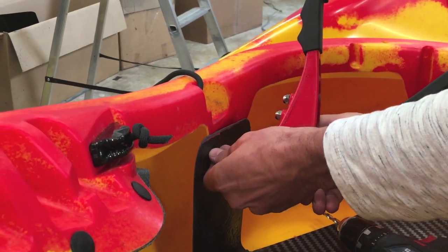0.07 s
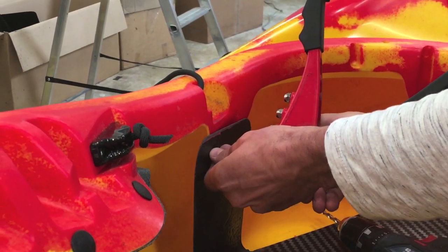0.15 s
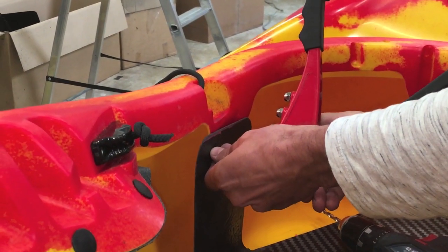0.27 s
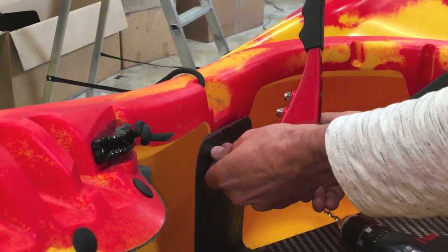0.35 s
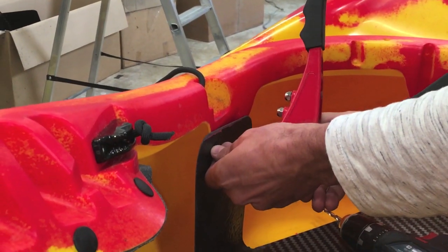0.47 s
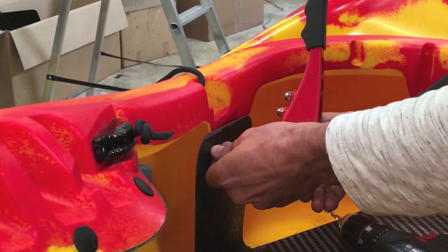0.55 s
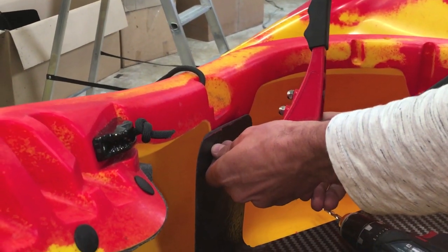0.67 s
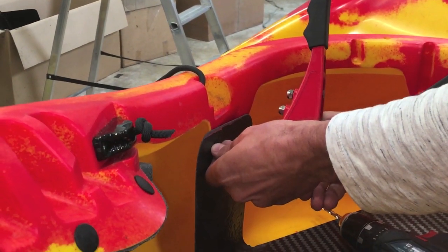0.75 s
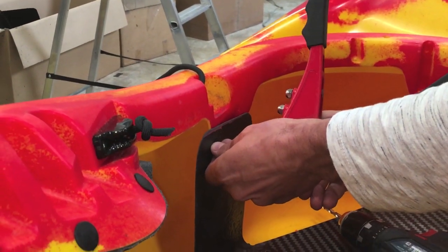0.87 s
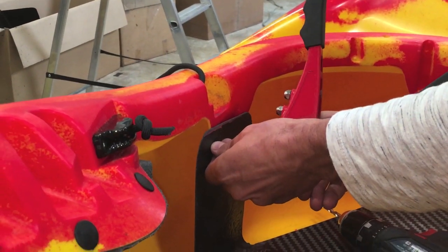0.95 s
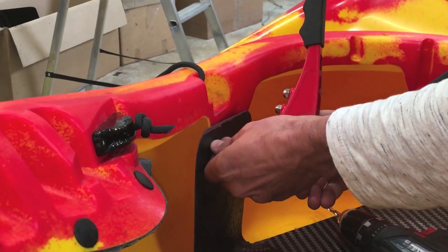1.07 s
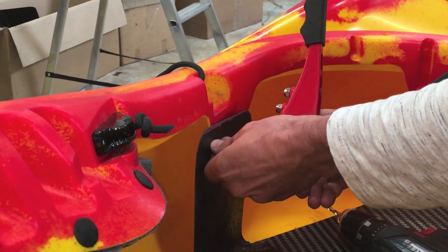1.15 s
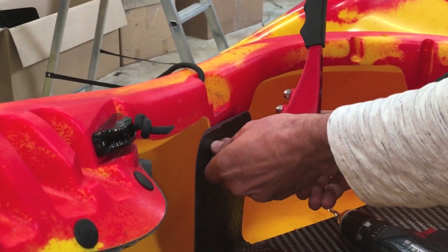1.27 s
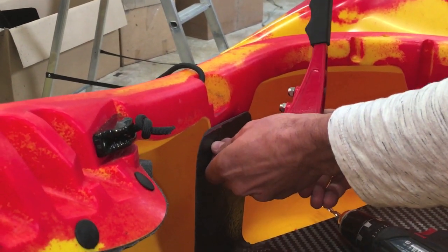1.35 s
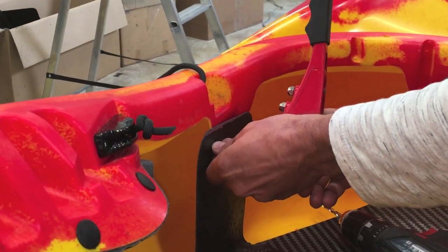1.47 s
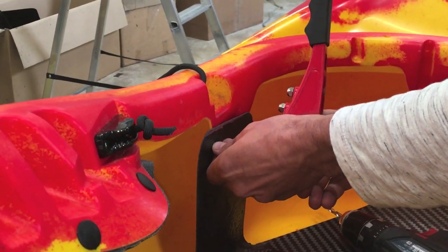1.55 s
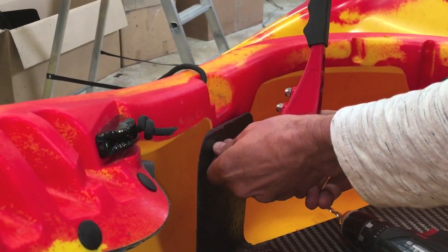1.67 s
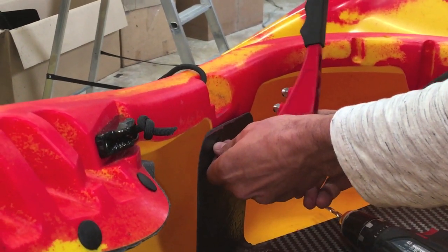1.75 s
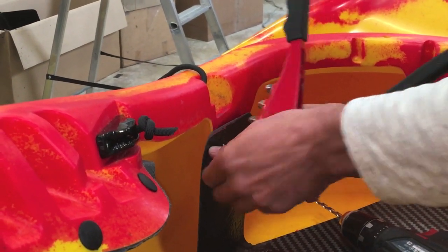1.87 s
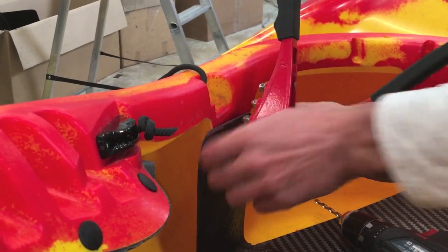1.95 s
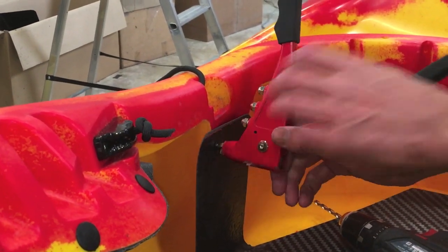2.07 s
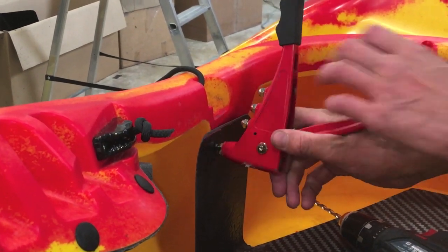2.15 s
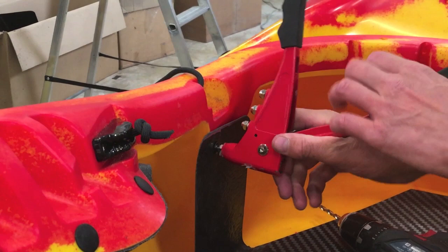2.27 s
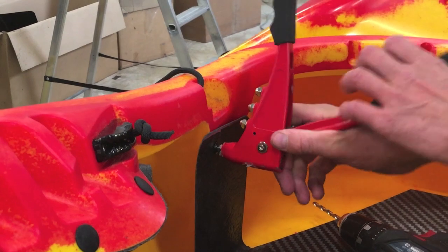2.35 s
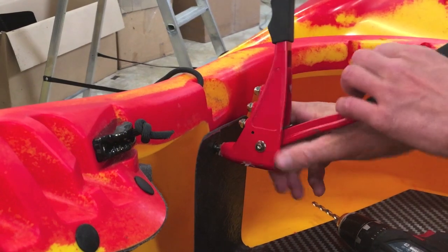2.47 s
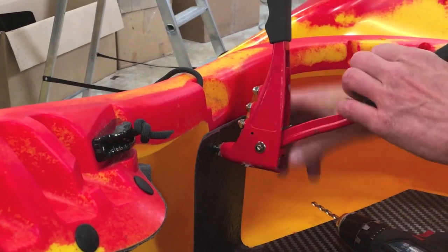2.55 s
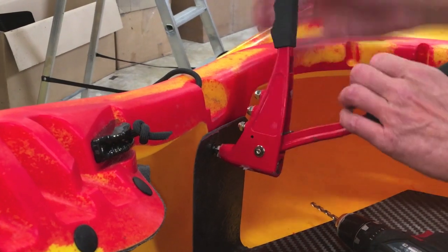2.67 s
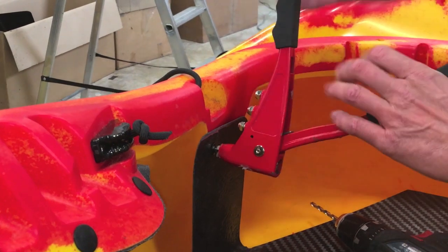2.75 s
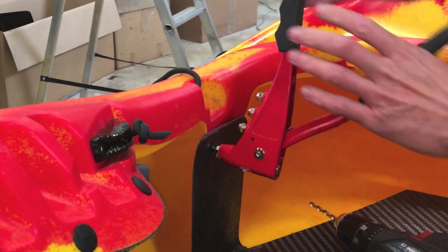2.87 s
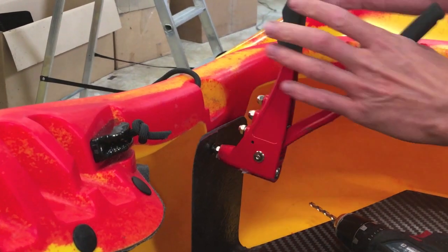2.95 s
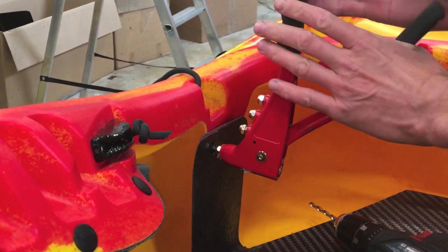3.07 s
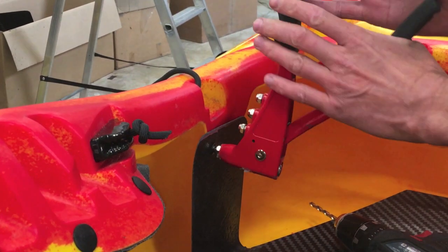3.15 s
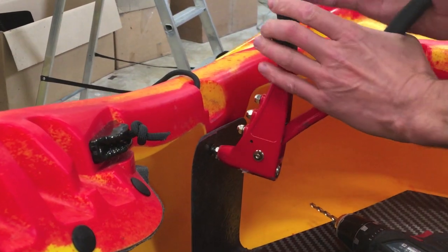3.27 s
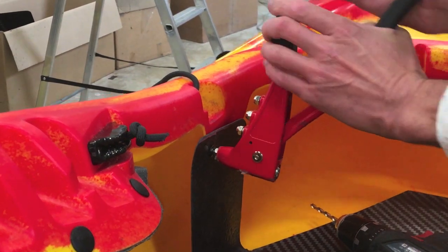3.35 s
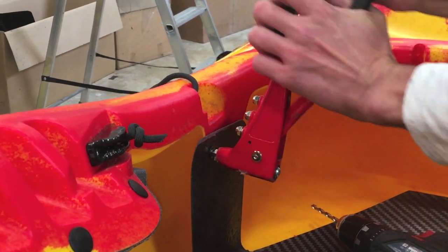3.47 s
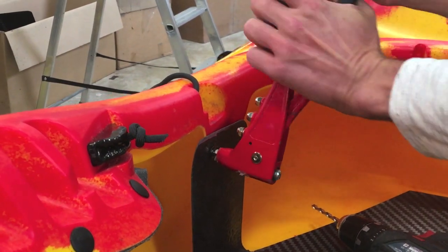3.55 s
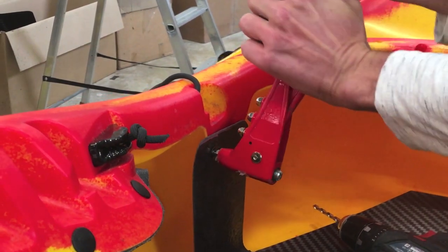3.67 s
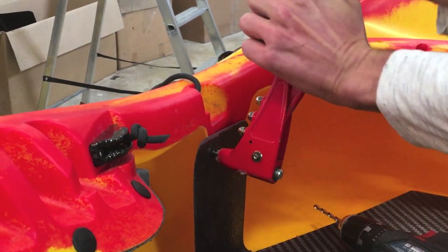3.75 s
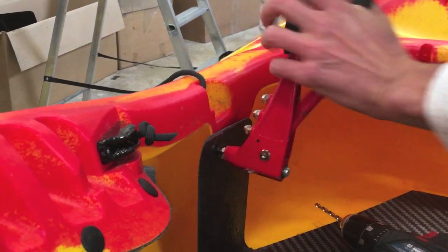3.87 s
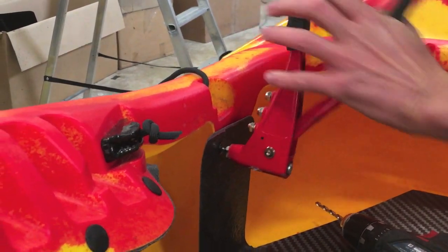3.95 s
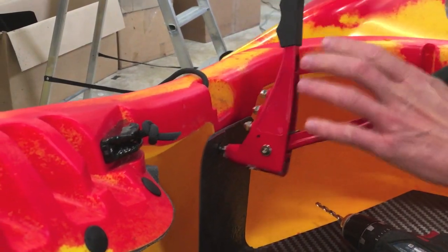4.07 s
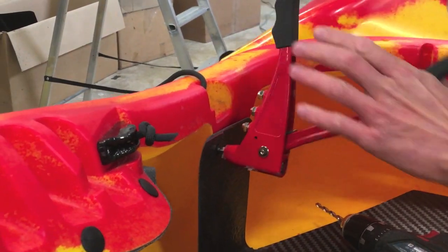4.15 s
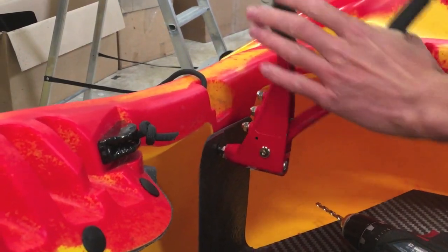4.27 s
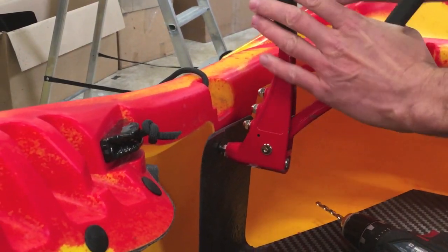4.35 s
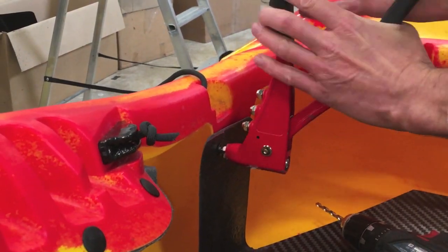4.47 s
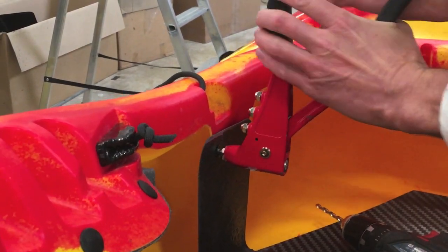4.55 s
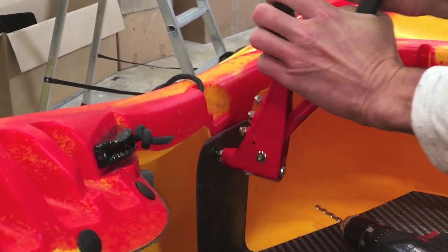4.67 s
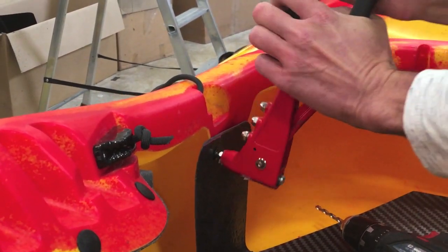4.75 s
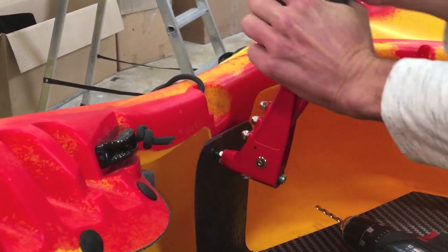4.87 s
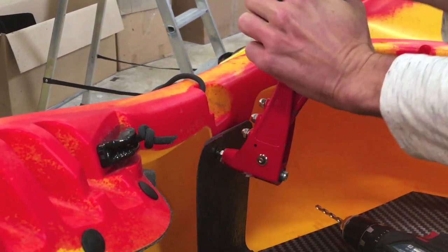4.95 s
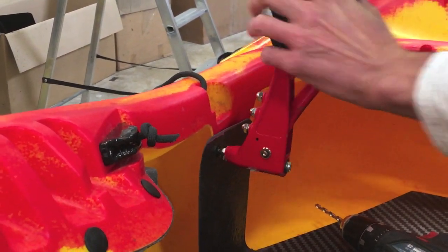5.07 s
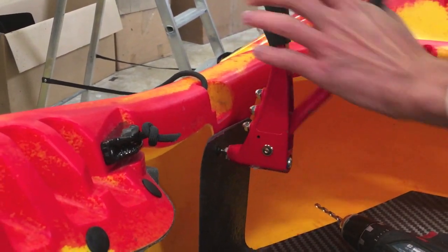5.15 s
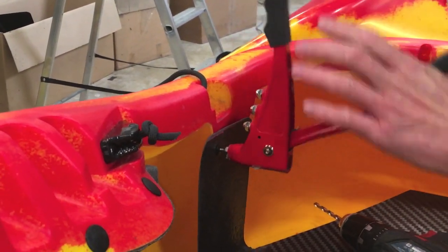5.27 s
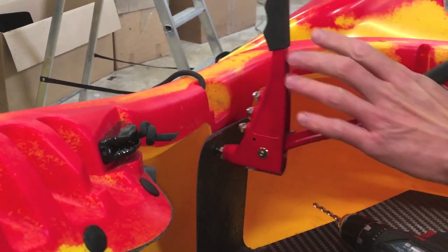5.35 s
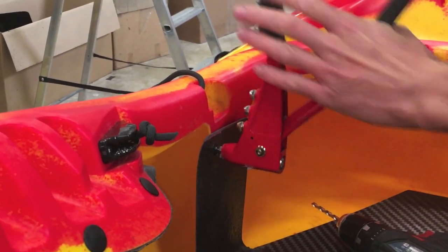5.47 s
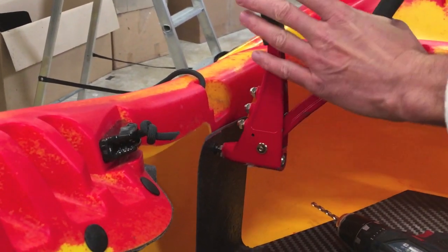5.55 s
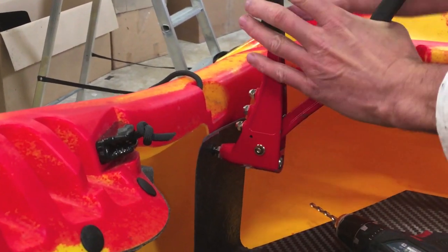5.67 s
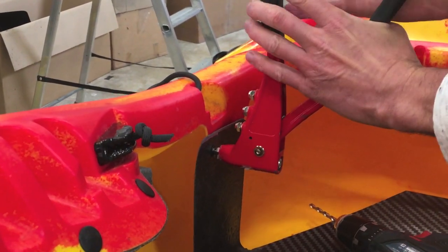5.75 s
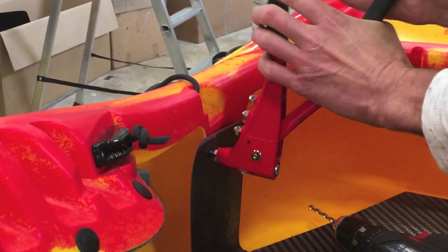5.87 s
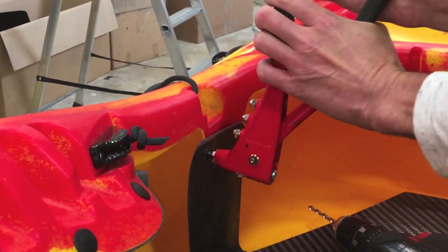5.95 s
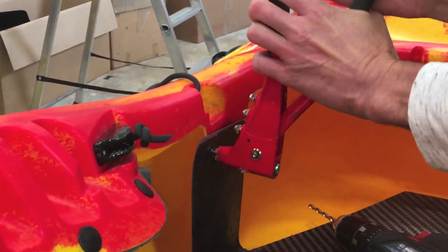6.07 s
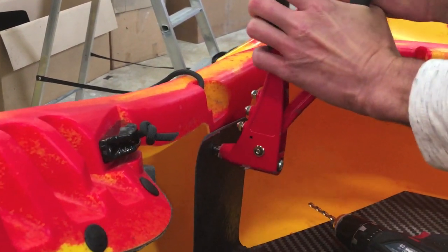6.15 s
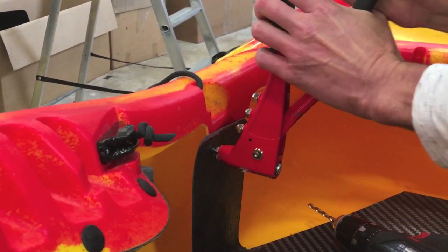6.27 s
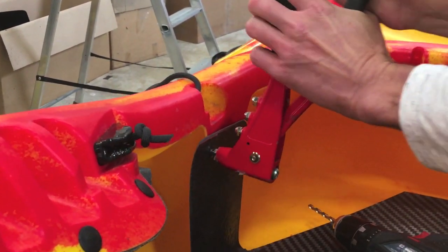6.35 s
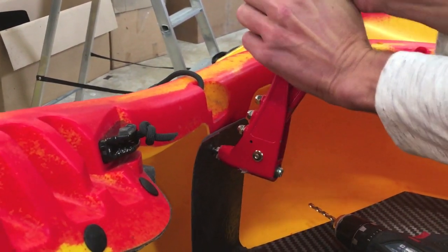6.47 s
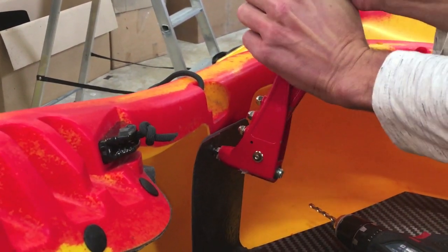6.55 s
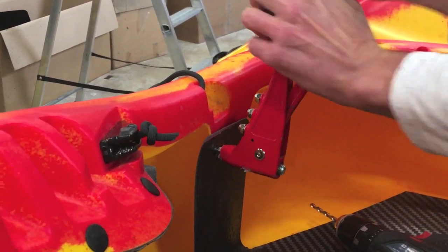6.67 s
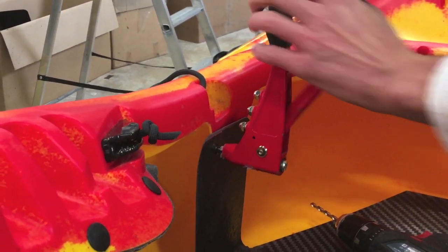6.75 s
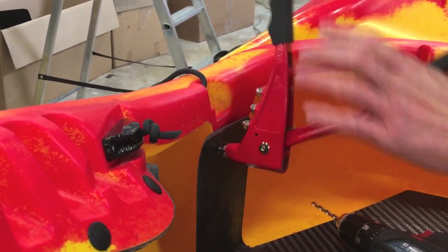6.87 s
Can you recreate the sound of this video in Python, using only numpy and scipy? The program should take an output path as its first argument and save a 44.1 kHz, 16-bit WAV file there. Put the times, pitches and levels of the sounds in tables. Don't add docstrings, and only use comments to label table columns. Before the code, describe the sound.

Close in a faintly humming workshop, hands softly bump and scuff a hollow plastic hull. A shuffle of knocks follows near two seconds, then deep thumps. A hand rivet tool is squeezed: bright steel creaks of rapid uneven clicks end in a handle clack, then again. A hard snap rings the wall, followed by two shorter grating squeezes and final knocks. Short room echo.

```python
import sys
import numpy as np
from scipy import signal
from scipy.fft import rfft, irfft
from scipy.io import wavfile
from scipy.ndimage import uniform_filter1d

SR = 44100
rng = np.random.default_rng(int(sys.argv[2]) if len(sys.argv) > 2 else 0)


def master(y):
    cut = np.clip(np.atleast_2d(y).T, -1, 1)
    pcm = np.round(cut * 32767)
    wavfile.write(sys.argv[1], SR, pcm.astype(np.int16))


N = 304731
STEP = 32


def gain_of(db):
    return np.exp(np.log(10) / 20 * np.asarray(db))


def evened(x):
    return x / np.sqrt(np.mean(x ** 2) + 1e-20)


def read(points, hz):
    f, value = np.transpose(points)
    return np.interp(np.log(hz + 1), np.log(f + 1), value)


def add(mix, s, sound):
    part = mix[round(s * SR):][:len(sound)]
    part += sound[:len(part)]


def wander(size):
    return evened(uniform_filter1d(rng.standard_normal(N), size=size))


def smooth(db):
    return np.interp(np.arange(N) / STEP, np.arange(len(db)), gain_of(db))


def swell(start, hold, first_db, last_db, rise, fall):
    t = np.arange(0, N + STEP, STEP) / SR - start
    held_db = first_db + (last_db - first_db) * np.clip(t / hold, 0, 1)
    return held_db + rise * np.minimum(t, 0) - fall * np.maximum(t - hold, 0)


def stroke(start, hold, first_db, last_db):
    return swell(start, hold, first_db, last_db, rise=3500, fall=520)


def coloured(points):
    frames, hz = N // 128 + 5, np.fft.rfftfreq(512, 1 / SR)
    a, b, patches = rng.standard_normal((frames, 257, 3)).T
    patches = uniform_filter1d(patches, size=6, axis=0)
    patches = evened(uniform_filter1d(patches, size=14, axis=1))
    z = (a + 1j * b) * gain_of(read(points, hz)[:, None] + 2.5 * patches)
    return evened(signal.istft(z, nperseg=512, noverlap=384)[1][:N])


def rings(modes, size):
    t = np.arange(size) / SR
    fade = np.cos(np.pi / 2 * t / t[-1])
    return fade * sum(gain_of(db - 60 * t / t60) * np.sin(2 * np.pi * hz * t) for hz, db, t60 in modes)


def blurred(hz, t, size):
    a, b = uniform_filter1d(rng.standard_normal((2, len(t))), size=size, axis=1)
    return evened(a * np.sin(2 * np.pi * hz * t) + b * np.cos(2 * np.pi * hz * t))


# frequency in Hz, level in dB per Hz.
AIR_COLOUR = [(15, -52.5), (25, -3), (60, 13), (87, -23), (177, -27), (349, -32), (878, -25.5),
              (1390, -30.5), (3510, -38.5), (4860, -42), (10400, -41), (15200, -35), (16500, -71)]


def air():
    hz = np.fft.rfftfreq(N, 1 / SR)
    spectrum = rfft(rng.standard_normal(N)) * gain_of(read(AIR_COLOUR, hz))
    return gain_of(-56) * evened(irfft(spectrum, N))


# time in seconds, effort in dB.
GRIP = [(0, -49.5), (0.9, -61), (1.05, -48.5), (1.82, -61.5), (1.94, -38), (2.5, -59.5), (3.04, -40.5),
        (3.25, -52.5), (3.81, -42), (4.06, -36.5), (4.2, -34.5), (4.7, -51.5), (4.98, -41.5), (5.2, -47),
        (5.46, -27.5), (5.699, -47), (6.5, -53), (6.91, -42)]


def effort():
    s, db = np.transpose(GRIP)
    return gain_of(np.interp(np.arange(N) / SR, s, db))


# start in seconds, hold in seconds, scuff in dB, dry hiss in dB.
RUBS = [(0, 0.0042, -47.5, -84), (0.042, 0.38, -66, -92), (0.602, 0.13, -62, -98), (0.974, 0.052, -47, -70),
        (1.245, 0.07, -58, -104), (1.358, 0.0089, -60, -69.5), (1.55, 0.1, -60.5, -88),
        (1.767, 0.14, -62, -74.5), (1.929, 0.019, -38.5, -51.5), (2.097, 0.37, -65.5, -76),
        (2.532, 0.008, -52, -62.5), (2.952, 0.045, -53, -58.5), (3.087, 0.15, -63, -73),
        (3.884, 0.051, -46.5, -72), (4.052, 0.056, -43.5, -69), (4.104, 0.011, -38, -54),
        (4.314, 0.0046, -42.5, -75), (4.472, 0.25, -74, -68.5), (4.805, 0.0088, -49.5, -57),
        (4.903, .01, -50.5, -65.5), (5.079, 0.662, -57, -78), (5.386, 0.0038, -32.5, -45),
        (5.42, .045, -53, -62.5), (5.56, 0.065, -52.5, -79), (5.518, 0.006, -35.5, -67.5),
        (5.6, 0.14, -63, -77.5), (5.846, 0.19, -83, -64.5), (6.14, 0.064, -62.5, -69),
        (6.576, 0.15, -61, -77), (6.781, 0.0083, -44, -53.5), (6.894, 0.017, -37, -58)]


def rubbing():
    rise, scuff_fall, hiss_fall = 450, 211, 317
    stroke_hiss_db = -20
    scuff = [swell(s, hold, db, db, rise, scuff_fall) for s, hold, db, _ in RUBS]
    hiss = [swell(s, hold, db, db, rise, hiss_fall) for s, hold, _, db in RUBS]
    hiss += [stroke(*row[:-1]) + stroke_hiss_db for row in SQUEEZES + OPENINGS]
    return smooth(np.max(scuff, axis=0)), smooth(np.max(hiss, axis=0))


# frequency in Hz, level in dB, t60 in seconds.
PANEL = [(525, -7.5, 0.13), (648, -4, 0.055), (934, 7, 0.014)]
# frequency in Hz, level in dB per Hz.
SCUFF_COLOUR = [(150, -48), (250, 7.5), (369, -2.5), (725, -1), (817, -17), (1490, -36), (1600, -7.5),
                (2070, -26.5), (3400, -20.5), (6190, -62), (9000, -44), (11700, -64), (19800, -120)]
# frequency in Hz, level in dB per Hz.
HISS_COLOUR = [(1470, -3), (2500, 1.5), (7550, -6.5), (9650, 5.5), (10400, -14.5), (12100, 2.5),
               (15100, -2), (16100, -11.5), (16500, -38.5)]


def hands(scuff, hiss):
    grip_scuff_db = -24
    panel = evened(signal.oaconvolve(rng.standard_normal(N), rings(PANEL, size=4000))[:N])
    rub = coloured(SCUFF_COLOUR) + 0.48 * panel
    dull_flicker = gain_of(-6.0 + 3.17 * wander(size=400))
    dry_flicker = gain_of(3.0 + 2.8 * wander(size=150))
    dull = (scuff + gain_of(grip_scuff_db) * effort()) * dull_flicker * rub
    return dull + hiss * dry_flicker * coloured(HISS_COLOUR)


def knock(db, edge_db, treble_db, hz, ring_db, t60=0.14):
    t = np.arange(SR // 4) / SR
    low, mid, high = rng.standard_normal((3, len(t)))
    body = evened(signal.sosfilt(signal.butter(2, [250, 1800], "band", fs=SR, output="sos"), low))
    edge = evened(signal.sosfilt(signal.butter(2, [1800, 6000], "band", fs=SR, output="sos"), mid))
    crack = evened(signal.sosfilt(signal.butter(2, 6000, "high", fs=SR, output="sos"), high))
    part = np.sin(2 * np.pi * hz * t) * gain_of(-60 * t / 0.06)
    part += blurred(hz * (1 - 0.16 * t), t, size=130) * gain_of(-12.0 - 60 * t / 0.19)
    body *= gain_of(2.4 * evened(uniform_filter1d(high, size=350)))
    sound = (body * gain_of(-60 * t / t60) + gain_of(ring_db) * part) * np.minimum(t / 0.0037, 1)
    sound += edge * gain_of(edge_db) * (gain_of(-60 * t / (0.94 * t60)) + gain_of(3.0 - 60 * t / 0.0054))
    sound += gain_of(edge_db + 1 - 60 * t / (0.52 * t60)) * blurred(3350, t, size=110)
    sound += gain_of(-15 - 60 * t / (0.71 * t60)) * blurred(1600, t, size=130)
    low_rise = np.minimum(t / 0.0065, 1)
    sound += gain_of(-9.0 - 60 * t / (0.9 * t60)) * low_rise * blurred(270, t, size=200)
    sound += crack * gain_of(treble_db - 60 * t / (0.26 * t60))
    return gain_of(db - 10.5) * sound * np.minimum(t / 0.00036, 1)


# start in seconds, peak in dB, edge in dB, treble in dB.
KNOCKS = [(0.004, -50.5, -27, -28), (0.151, -49, -25, -26), (0.195, -51, -11.5, -26),
          (0.624, -59, -25, -27), (0.69, -62, -6, -24), (0.903, -53.5, -19, -18), (0.977, -38, -16, -16),
          (1.24, -46, -30, -32), (1.536, -40.5, -13, -30), (1.855, -45, -5, 9.5), (1.911, -32.5, -19, 1),
          (1.988, -35, -11.5, 3), (2.52, -45, 6, 17.5), (2.846, -57, 0, 14), (3.215, -50.5, -21, -6),
          (4.041, -33, -8.5, -15), (4.079, -43, 3.5, -8), (4.115, -26.5, -0.5, 7), (4.201, -46, 8.5, 13.5),
          (4.297, -40.5, -0.5, -11), (4.804, -47, -15, -22), (5.091, -40, -31, -7), (5.129, -40, -20, -2),
          (5.253, -30.5, -9.5, -13), (5.309, -38.5, -23, -25), (5.383, -25, 5, 18), (5.525, -35.5, -5, 4),
          (6.134, -76, -19.5, -4), (6.743, -37.5, -25, -25), (6.777, -40, -7, -13)]


def knocks():
    wall_hz, spread = 609.4, 0.1324
    even_ring_db, ring_per_db = -26.5, -0.5
    out = np.zeros(N)
    for (s, db, *colour), spot in zip(KNOCKS, rng.uniform(-1.053, 1, len(KNOCKS))):
        ring_db = ring_per_db * (db - even_ring_db)
        add(out, s, knock(db, *colour, wall_hz * (1 + spread * spot), ring_db))
    return out


# start in seconds, length in seconds, frequency in Hz, level in dB.
SQUEALS = [(2.937, 0.35, 3690, -74), (3.282, 0.39, 3700, -71), (4.286, 0.31, 3720, -75.5),
           (5.24, 0.13, 3790, -65.5), (5.493, 0.1, 3770, -77), (5.845, 0.14, 2456, -63),
           (6.369, 0.14, 3640, -67.5), (6.373, 0.21, 2090, -72), (6.798, 0.1, 4800, -65),
           (0.14, 0.33, 525, -68), (5.123, 0.08, 2200, -65)]


def squeals():
    out = np.zeros(N)
    for s, length, hz, db in SQUEALS:
        t = np.arange(0, length, 1 / SR)
        add(out, s, gain_of(db) * np.sqrt(np.sin(np.pi * t / length)) * blurred(hz, t, size=260))
    return out


def bending(x, lag_s=0.0174, slope=0.8):
    hz = np.fft.rfftfreq(len(x), 1 / SR)
    delay = 0.004 + lag_s * (70 / np.maximum(hz, 40)) ** slope
    soft = 1 / (1 + (hz / 270) ** 6)
    phase = np.exp(-2j * np.pi * np.cumsum(delay) * hz[1])
    wave = irfft(rfft(x) * soft * phase, len(x))
    return wave * signal.windows.tukey(len(x), 0.02)


# frequency in Hz, level in dB, t60 in seconds.
HULL = [(45.6, -40, .3), (63, -6.5, 0.74), (76.95, 3, 0.81), (86.2, -2, 0.12), (116.2, -2, 0.35),
        (147.6, -2, 0.24), (169.7, -8.5, 0.42), (222.2, -1.5, 0.087), (295.3, -12.5, 0.22)]


def boom(detune):
    modes = np.array(HULL) * np.transpose([detune, 1 + 0 * detune, 1 + 0 * detune])
    t = np.arange(2 ** 14) / SR
    passing = (0.5 + 0.54 * np.exp(-(t / 0.017) ** 2)) * np.minimum(t / 0.003, 1)
    return [bending(passing * rings(part, size=len(t))) for part in (modes[:3], modes[3:])]


# start in seconds, peak in dB, upper modes in dB.
THUMPS = [(0.162, -35, 3), (0.629, -48, 6), (0.901, -51.5, 9), (0.99, -29, -13), (1.241, -36, -17),
          (1.554, -32, 0), (1.862, -27, -12), (1.927, -31, -12), (2, -38, 17), (2.203, -28, 3),
          (2.444, -32, 8.5), (2.529, -18.5, 4), (2.839, -17.5, -5), (2.978, -24.5, -2), (3.402, -37, -25),
          (3.55, -30, -5), (3.688, -28, 4), (3.698, -17, 2.5), (3.893, -29.5, 13.5), (4.049, -24.5, 5.5),
          (4.116, -16, 5.5), (4.322, -19, -2.5), (4.806, -20, -7), (4.906, -36, 7), (4.915, -17.5, -0.5),
          (5.12, -36, 12.5), (5.277, -25, 3), (5.389, -17, 8.5), (5.529, -26.5, 16), (5.933, -24.5, -35),
          (6.142, -35, -1), (6.578, -32, 14.5), (6.591, -20, -3), (6.747, -28.5, 12.5), (6.777, -17.5, 2),
          (6.881, -17.5, 2.5)]


def hull(scuff):
    grip_upper_db, rub_upper_db = -16.5, 4
    out = np.zeros(N)
    chances = rng.standard_normal((len(THUMPS), len(HULL)))
    for (s, db, upper_db), chance in zip(THUMPS, chances):
        low, upper = boom(1 + 0.0649 * chance)
        add(out, s - 0.004, gain_of(db - 7) * (low + gain_of(upper_db - 1.0) * upper))
    low_drive = effort()
    upper_drive = gain_of(grip_upper_db) * effort() + gain_of(rub_upper_db) * scuff
    for modes, drive in zip(boom(np.ones(len(HULL))), (low_drive, upper_drive)):
        rumble = evened(signal.oaconvolve(rng.standard_normal(N), modes)[:N])
        out += gain_of(3.0) * drive * rumble
    return out


# start in seconds, peak in dB, edge in dB, treble in dB, struck part in Hz.
CLACKS = [(0.262, -53.5, -26, -24, 730), (1.318, -50.5, -31, -14, 860), (1.351, -53, -5, 17.5, 1596),
          (2.978, -42, -9, -6, 868), (3.395, -48.5, -22, -7, 916), (3.688, -29.5, -6, -12, 1606),
          (3.875, -38.5, -11.5, -16, 952), (4.909, -32, -4, -22, 1330), (5.368, -34.5, -2, 4.5, 890),
          (6.525, -48, -8, -3, 896), (6.5801, -32, -3.5, -24, 1330), (6.88, -26, -20, -13, 1050)]


def clacks():
    out = np.zeros(N)
    for s, *blow in CLACKS:
        add(out, s, knock(*blow, ring_db=6))
    return out


# start in seconds, peak in dB, edge in dB, treble in dB, struck part in Hz.
BUMPS = [(0.945, -51, -20, -30, 563), (0.989, -39.5, -4.5, -20, 3460), (1.233, -51, -16, -30, 1620),
         (1.268, -48.5, -24, -30, 586), (1.353, -44, -13, -20, 2100), (1.926, -35, -14, -15, 756),
         (1.969, -32.5, -12.5, -20, 3240), (4.131, -36, -15, -20, 1080)]


def bumps():
    out = np.zeros(N)
    for s, *blow in BUMPS:
        add(out, s, knock(*blow, ring_db=-1.3, t60=0.13))
    return out


# start in seconds, peak in dB.
TICKS = [(1.603, -48), (1.6541, -49), (1.668, -49), (2.161, -41.5), (2.2977, -45), (2.4864, -47),
         (2.55, -43), (2.709, -47), (2.826, -43), (3.2114, -37), (3.8692, -37.5), (3.931, -52),
         (4.047, -42), (4.083, -47), (4.108, -44), (4.138, -28), (4.155, -25), (4.978, -50), (5.032, -47),
         (6.145, -41), (6.743, -37.5)]


def ticks():
    out, t = np.zeros(N), np.arange(2000) / SR
    for s, db in TICKS:
        fade = gain_of(db - 17 - 60 * t / 0.14) + gain_of(db - 14.5 - 60 * t / 0.0095)
        bright = np.diff(rng.standard_normal(len(t) + 2), n=2) / 2
        add(out, s, fade * bright)
    return out


# start in seconds, peak in dB, frequency in Hz.
NUDGES = [(2.437, -42, 218), (2.522, -38, 230), (2.824, -42, 201), (3.706, -24, 151), (3.877, -31, 219),
          (3.961, -33, 226), (4.042, -32.5, 230), (4.313, -30.5, 244), (5.094, -27, 241), (5.114, -28, 220),
          (5.258, -36, 253), (5.323, -32, 200.7), (5.529, -18, 231), (6.582, -41.5, 383)]


def nudges():
    out, t = np.zeros(N), np.arange(4000) / SR
    for s, db, hz in NUDGES:
        note = np.sin(2 * np.pi * hz * t * (1 - 2.5 * t))
        add(out, s, gain_of(db - 60 * t / 0.094) * np.minimum(t / 0.0038, 1) * note)
    return out


# start in seconds, peak in dB, upper against lower rings in dB.
SLIPS = [(2.926, -30, -12), (3.2746, -19.5, -5), (3.3031, -21, -2), (3.3277, -26, 1), (3.34, -26.5, -2),
         (3.365, -26.5, 2), (3.3958, -27, -14), (3.494, -34, 3), (3.9018, -42, 13), (4.28, -47, -8),
         (4.372, -27.5, 0), (4.5, -25, -1), (4.54, -28, 2), (4.552, -25.5, -2), (4.571, -23, 0),
         (4.6026, -22.5, -0.5), (4.634, -28, 6.5), (4.6505, -23.5, 0), (4.667, -28, 5), (4.6778, -30, 3),
         (5.159, -36.5, 15), (5.504, -35, -14), (5.8085, -19.5, -2.5), (5.8414, -21.5, -2),
         (5.858, -24, 2.5), (5.882, -27, 5), (5.893, -23, -1), (5.909, -22, -18.5), (6.0251, -24.5, -2),
         (6.364, -26.5, 2), (6.777, -33, 17.5)]
# start in seconds, peak in dB.
QUICK = [(3.3521, -26), (3.3771, -30), (3.3839, -28), (3.4017, -30), (3.407, -28), (3.4146, -29),
         (3.422, -29), (3.4315, -29), (3.4447, -32), (3.4524, -37), (3.458, -32), (3.467, -32),
         (3.4753, -32), (3.4825, -26.5), (3.4995, -31), (3.508, -34), (3.5128, -34), (3.5185, -32),
         (3.5298, -30), (3.5442, -40), (3.5571, -37), (3.623, -43), (4.6168, -23.5), (4.687, -31),
         (4.6917, -31), (4.7012, -35), (4.7086, -34), (4.7164, -30), (4.726, -31), (4.735, -28),
         (4.7423, -30), (4.7496, -30), (4.759, -28), (4.7689, -34), (4.7855, -33), (4.7955, -38),
         (4.8071, -39), (5.874, -26), (5.9178, -24), (5.9235, -31), (5.9356, -37), (5.9406, -37),
         (5.9453, -34), (5.959, -31), (5.964, -32), (5.9726, -35), (5.981, -29), (5.9883, -32),
         (5.9953, -32), (6.001, -28), (6.0105, -29), (6.3727, -27), (6.38, -33), (6.382, -31), (6.395, -42),
         (6.4081, -39), (6.44, -35), (6.446, -30), (6.458, -32)]


def slip_taps():
    taps = np.zeros((4, N))
    tilts = 2.2 * rng.standard_normal(len(QUICK))
    for s, db, upper_db in SLIPS + [(*row, tilt) for row, tilt in zip(QUICK, tilts)]:
        taps[:, round(s * SR)] = gain_of([db + 0.0, db - 7.5, db + upper_db, db + 0.5])
    chatter = rng.standard_normal(700) * gain_of(-60 * np.arange(700) / SR / 0.024)
    chatter /= np.linalg.norm(chatter)
    shaken = [0, 1, 3]
    shudder = signal.oaconvolve(taps[shaken], chatter[None], axes=1)[:, :N]
    taps[shaken] = 0.45 * taps[shaken] + 0.82 * shudder
    return taps


# start in seconds, hold in seconds, creak at start in dB,
# creak at end in dB, upper rings in dB.
SQUEEZES = [
    (3.376, 0.21, -52, -48, 6),
    (4.685, 0.11, -44.5, -46, 4.5),
    (5.925, 0.073, -38.5, -43, -8),
    (6.363, 0.12, -40.5, -51, -1),
]
# start in seconds, hold in seconds, creak at start in dB,
# creak at end in dB, upper rings in dB.
OPENINGS = [
    (2.929, 0.051, -48, -43, 1),
    (3.902, 0.19, -51, -39.5, 3.5),
    (4.271, 0.024, -51, -41, 3.9),
    (5.097, 0.19, -50, -44, 7.3),
    (5.49, 0.02, -51, -38.5, 2.2),
    (6.78, 0.12, -46, -47, 4.9),
]
# loaded rings at start in dB, at end in dB, free ring in dB.
LOADED_DB = [
    (6.5, 7.5, -7),
    (5, -16.5, 0),
]
GRAIN = [
    (0.45, 0.4),
    (0.17, 1),
]


def stroke_taps():
    taps, slips_per_s = np.zeros((4, N)), 140
    size = gain_of(2.6 * rng.standard_normal(N))
    pace = slips_per_s / SR * gain_of(4.5 * wander(size=120))
    slips = np.diff(np.floor(np.cumsum(pace)), prepend=0)
    slips *= size * np.sqrt(SR / slips_per_s)
    grit = rng.standard_normal(N) * gain_of(3.0 * wander(size=90))
    for rows, (*loaded_db, free_db), (slip, fill) in zip((SQUEEZES, OPENINGS), LOADED_DB, GRAIN):
        drive = slip * slips + fill * grit
        for s, hold, first_db, last_db, upper_db in rows:
            db = stroke(s, hold, first_db, last_db) - 11.0
            taps[0] += drive * smooth(db)
            taps[1] += drive * smooth(db + swell(s, hold, *loaded_db, 0, 0))
            taps[2] += drive * smooth(db + upper_db)
            taps[3] += drive * smooth(db + free_db)
    return taps


def ringing(taps, hz, width, start_hz=850):
    turn = np.exp(2j * np.pi * np.cumsum(hz) / SR)
    die, start = np.exp(-np.pi * np.array([width, start_hz]) / SR)
    poles = np.convolve([1, -die], [1, -start])
    return (turn * signal.lfilter([1 - start], poles, taps / turn)).real


# frequency in Hz, width in Hz, level in dB.
TOOL = [(2515, 480, -12.5), (3680, 170, -14.5), (6260, 210, -21), (5140, 130, -15.5), (6980, 330, -15),
        (8450, 240, 1), (9000, 220, -5), (9350, 230, -9), (10900, 260, -12), (11960, 157, -5),
        (13320, 290, -2), (14640, 540, -5), (15430, 580, -5.5)]
# time in seconds, first ring in Hz,
# first ring in dB, side ring in dB, high ring in dB.
ANGLE = [(2.93, 8470, 6.5, -2, 6), (3.27, 8660, 0.5, -6.5, -1), (3.5, 8520, 2, 6.5, 5.5),
         (3.62, 8600, -5, -4, -10), (3.9, 8660, -8, -9, -9), (4.05, 8780, 0.5, -4, -9),
         (4.27, 8460, 11, -2, 10), (4.5, 8400, -1, -6, -8), (4.76, 8570, 0, 2, -9), (4.85, 8750, 0, 3, -3),
         (5.1, 8650, -15, 0, -16), (5.22, 8540, 7.5, -5.5, 2), (5.5, 8460, 2, 0, -3),
         (5.8, 8420, 4, -8, -7), (6.0, 8550, 0.5, 3.5, 1.5), (6.37, 8460, -1, -2, -11),
         (6.78, 8300, -4, -3, -7), (6.9, 8700, 2, 0, -3)]
# time in seconds, low ring in Hz, low ring in dB,
# middle ring in Hz, middle ring in dB.
LOWER = [
    (3.27, 2600, 1, 5220, 2),
    (3.4, 2350, 9, 5160, 4.5),
    (3.5, 2460, 1, 5330, 0),
    (3.6, 2600, -11, 5300, 4),
    (4.6, 2440, 4, 5190, 7.5),
    (4.8, 2510, 2, 5100, 0),
    (5.8, 2300, 0.5, 5230, 1),
    (5.92, 2550, 3, 5130, 2.5),
    (6.03, 2350, 2.5, 5130, 1),
    (6.4, 2380, -4, 5130, -2),
]


def tool():
    taps = slip_taps() + stroke_taps()
    out, used = np.zeros(N), slice(round(2.9 * SR), N)
    clock = np.arange(N)[used] / SR
    load, contact = wander(size=4500), 2.5 * rng.standard_normal(N)
    at, *angle = np.transpose(ANGLE)
    first_hz, first_db, side_db, high_db = [np.interp(clock, at, y) for y in angle]
    moment, *lower = np.transpose(LOWER)
    low_hz, low_db, middle_hz, middle_db = [np.interp(clock, moment, y) for y in lower]
    moving_hz = {0: low_hz, 3: middle_hz, 5: first_hz}
    moving_db = {0: low_db, 3: middle_db, 5: first_db, 6: side_db, 9: high_db}
    for k, (hz, width, db) in enumerate(TOOL):
        hz, db = moving_hz.get(k, hz), db + moving_db.get(k, 0)
        chance_db = np.roll(contact, 977 * k) + 2.5 * np.roll(load, 9001 * k)
        balance = gain_of(db + chance_db[used])
        bent_hz = hz * (1 + 0.004 * np.roll(load, 2003 * k)[used])
        band = np.searchsorted([3000, 4000, 5050, 5600, 8800, 10000], np.mean(hz))
        group = [0, 3, 0, 1, 0, 1, 2][band]
        out[used] += ringing(taps[group, used] * balance, bent_hz, width)
    t = np.arange(1000) / SR
    crack = rng.standard_normal(len(t)) * gain_of(-11.0 - 60 * t / 0.0085)
    bright = signal.butter(2, 7000, "high", fs=SR, output="sos")
    return 0.27 * out + signal.sosfilt(bright, signal.oaconvolve(taps[2], crack)[:N])


STOPS = [
    3.688,
    4.910,
    6.5795,
]
# frequency in Hz, t60 in seconds, level in dB at each of the three stops.
HANDLES = [(1050, 0.14, -63, -56, -54.5), (1330, 0.11, -60, -50, -51), (1623, 0.11, -40, -48.5, -45.5),
           (1760, 0.046, -60, -49, -65), (2886, 0.06, -50, -45, -42.5), (3554, 0.053, -49, -53, -49),
           (3890, 0.058, -48, -44, -46), (4230, 0.12, -56, -58, -61), (4560, 0.072, -52, -53, -50),
           (5800, 0.038, -42, -55, -49)]


def handles():
    out, t = np.zeros(N), np.arange(8000) / SR
    for hz, t60, *levels in HANDLES:
        for s, db in zip(STOPS, levels):
            ring = blurred(hz, t, size=220) + (2600 / hz) * np.sin(2 * np.pi * hz * t)
            add(out, s, gain_of(db - 60 * t / t60) * np.minimum(t / 0.0012, 1) * ring)
    return out


# frequency in Hz, level in dB, t60 in seconds.
SNAP = [(236, 9, 0.21), (757, 3.5, .16), (1107, -1, 0.18), (1586, -2, 0.13), (1930, 0, 0.15),
        (2080, -9, 0.64), (2200, 5.5, 0.16), (2750, -9.5, .4), (2910, 2.5, 0.068), (3580, -13, .45),
        (4260, -14.5, 0.33), (5000, 1, 0.076), (5970, 9.5, 0.041), (6650, 6.5, 0.055)]


def snap():
    out, t = np.zeros(N), np.arange(SR // 2) / SR
    for hz, db, t60 in SNAP:
        fade = gain_of(db - 37 - 60 * t / t60) * np.minimum(t / 0.0016, 1)
        add(out, 5.384, fade * blurred(hz, t, size=260))
    return out


# frequency in Hz, t60 in seconds.
SHOP = [(250, 0.13), (1000, 0.73), (4000, 0.48), (12000, 0.19)]


def shop(x):
    taps = np.zeros(SR // 2)
    at = np.arange(200, len(taps) - 20, 20)
    taps[at + rng.integers(0, 20, len(at))] = rng.choice([-1., 1.], len(at))
    hz, t, z = signal.stft(taps, SR, nperseg=256)
    tail = signal.istft(z * gain_of(-60 * t / read(SHOP, hz)[:, None]), SR, nperseg=256)[1]
    return signal.oaconvolve(x, tail / np.linalg.norm(tail))[:N]


def scene():
    scuff, hiss = rubbing()
    struck = knocks() + squeals() + clacks() + ticks() + handles() + snap()
    steel = tool()
    wet = shop(gain_of(-9.5) * steel + gain_of(-15.0) * struck)
    close = hull(scuff) + hands(scuff, hiss) + bumps() + nudges()
    return (steel + struck + wet + close + air())[None]


def roll_off(x):
    return signal.sosfilt(signal.butter(12, 16660, fs=SR, output="sos"), x)


def record(dry):
    cut = signal.sosfilt(signal.butter(4, 55, "high", fs=SR, output="sos"), dry)
    cut = signal.oaconvolve(cut, signal.firwin(201, 15800, fs=SR)[None], "same")
    return roll_off(cut)


dry = scene()
out = record(dry)
master(out)
```